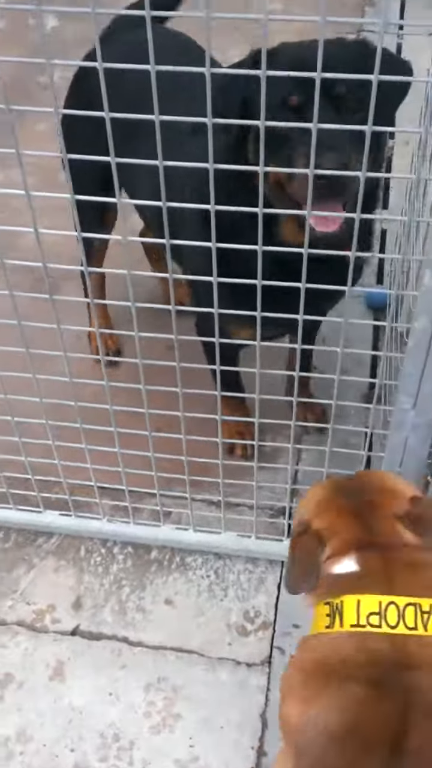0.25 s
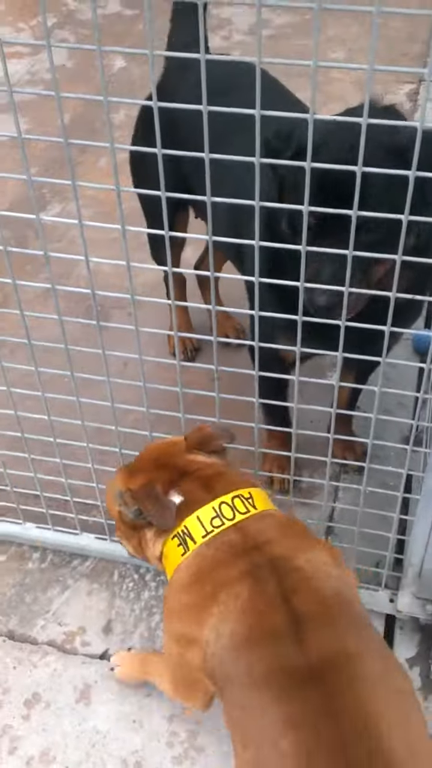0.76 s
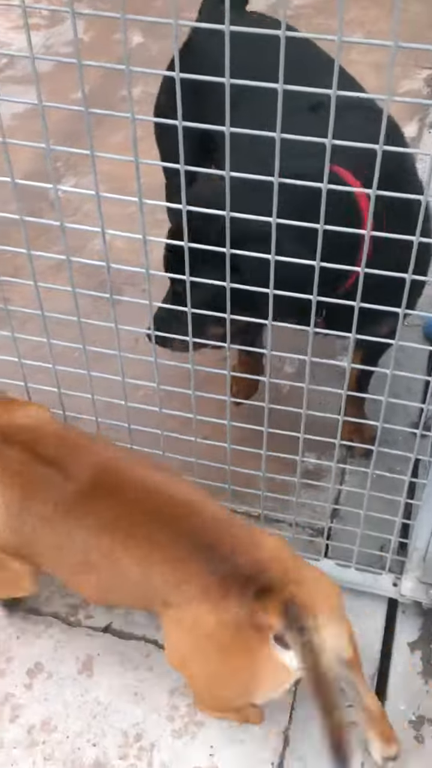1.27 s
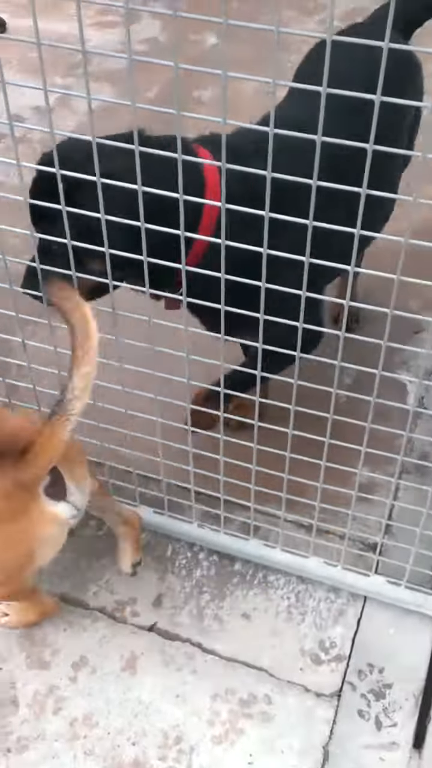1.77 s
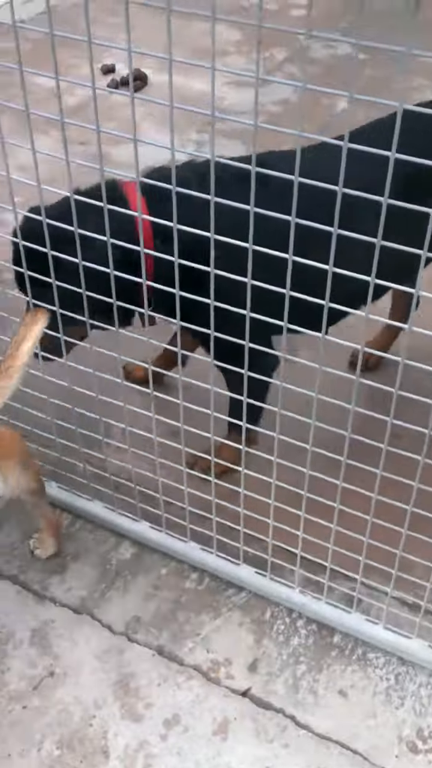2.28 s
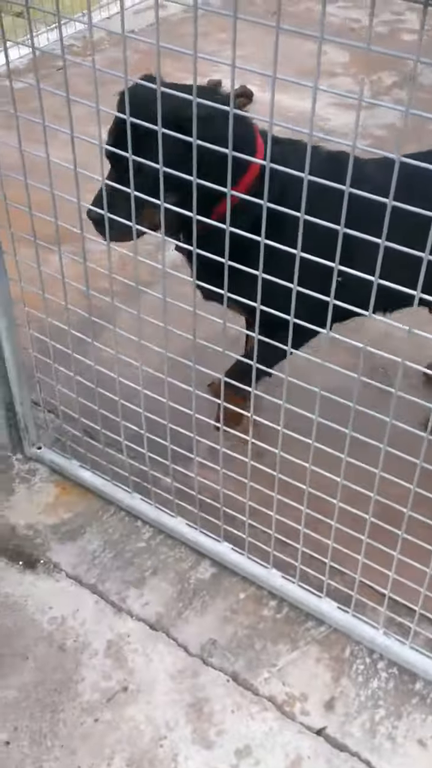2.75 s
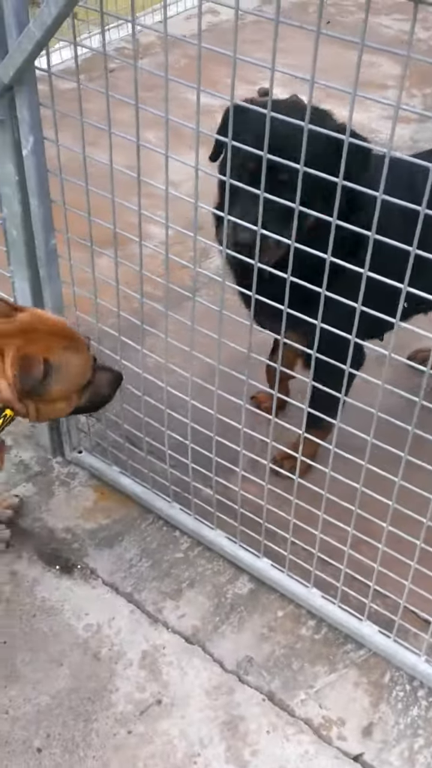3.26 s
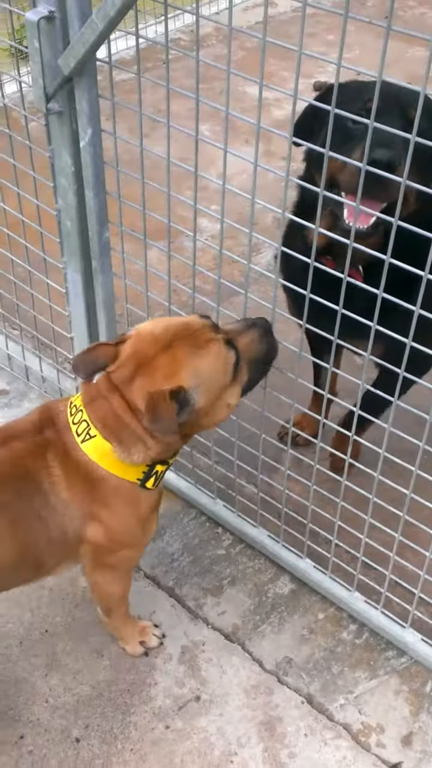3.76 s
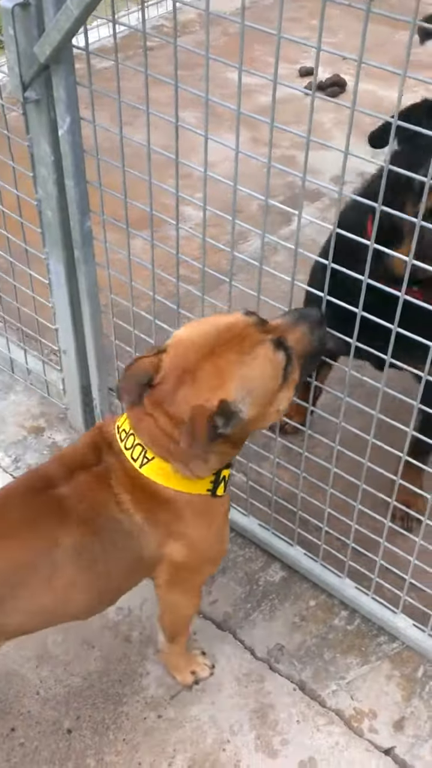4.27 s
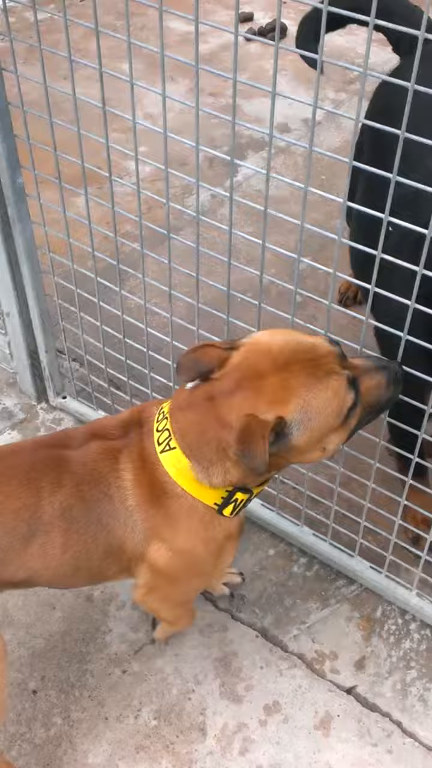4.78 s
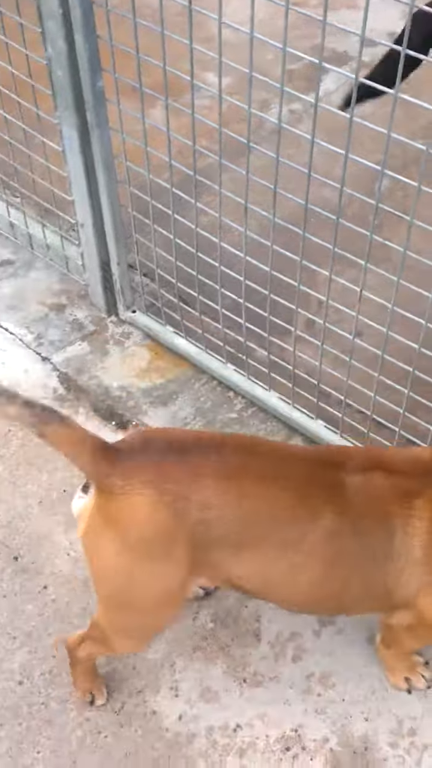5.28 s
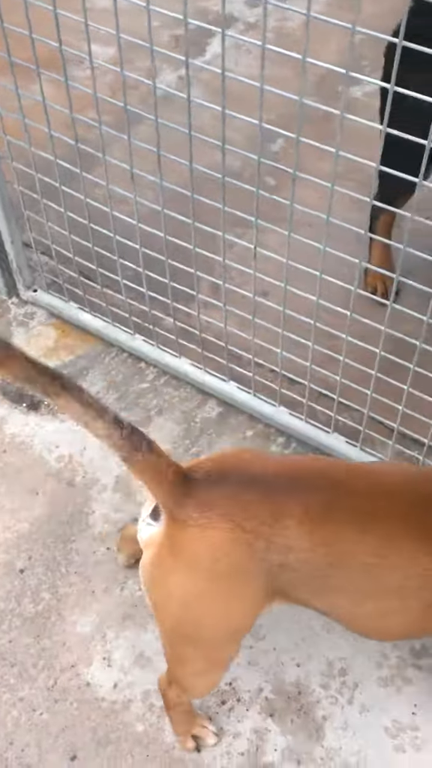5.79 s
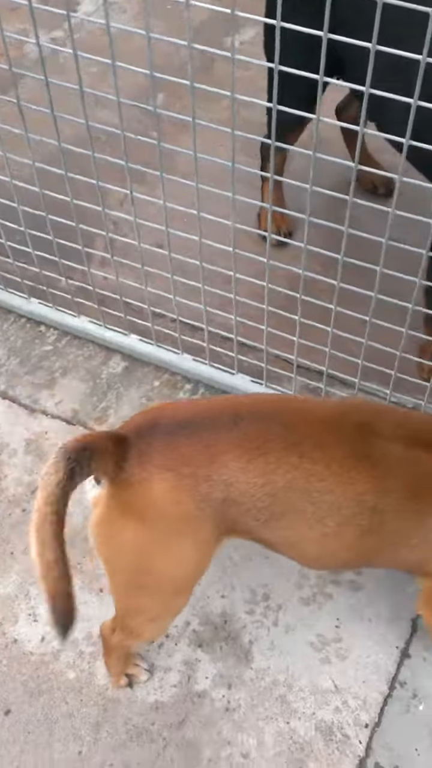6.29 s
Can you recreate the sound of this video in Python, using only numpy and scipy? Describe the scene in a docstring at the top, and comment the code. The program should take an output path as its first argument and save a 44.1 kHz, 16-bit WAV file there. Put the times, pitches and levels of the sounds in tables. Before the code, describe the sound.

Close stereo pickup beside a wire kennel fence: distant rough barking first, then nearly four seconds of quiet sniffing, muffled wuffs, sparse padded steps and tiny high whines over faint hiss. Four loud, abrupt barks burst out nearby, breaking hoarsely at their ends, with brief growls. Farther dogs join with raspy barks, a throbbing howl and whimpers, as bright nose whistles rise; short hard reverberation surrounds everything.

```python
"""Concrete kennel block, outdoors: dogs at a wire fence close to the microphones, others farther down the pens.
Up close come closed-mouth wuffs, then four sharp, cracking barks with low growls between and after;
farther off are hoarse barks, a pulsing howl and falling whimpers, all from the same modelled vocal folds.
Nasal whistles are arching tones; snuffles, paw steps, faint background noise and a high hiss of varying
level are coloured noise. Decaying noise tails give the echo of the pens."""
import sys
import numpy as np
from scipy import signal
from scipy.fft import rfft, irfft, next_fast_len
from scipy.io import wavfile
from scipy.ndimage import map_coordinates

SR = 44100
rng = np.random.default_rng(int(sys.argv[2]) if len(sys.argv) > 2 else 0)


def master_out(mix):
    """Clip the mix to full scale and print it as 16-bit PCM to the path in sys.argv[1]."""
    frames = np.transpose(np.atleast_2d(mix))
    ceiling = np.clip(frames, -1, 1)
    pcm = np.round(ceiling * 32767).astype(np.int16)
    wavfile.write(sys.argv[1], SR, pcm)


N = 288414  # samples

# Levels are those of the sources, ahead of the pens' direct and echo gains.
# Overtone levels are relative to the fundamental; roughness is clipped to 0-1.

# close wuffs: (start [s], length [s], top pitch [Hz], level [dB], top overtones [dB],
#               roughness at the push [0-1 once clipped])
WUFF_CALLS = [(0, .034, 472, -36, 0.5, 0.31), (0.836, 0.13, 510, -38, 6, 1.18),
              (2.535, 0.13, 525.3, -38.5, 1, 1.17)]
# close growls: (start [s], length [s], pitch [Hz], level [dB], overtones [dB])
GROWL_CALLS = [(0, 0.014, 142, -31.5, -4.5), (.85, 0.158, 179, -52.5, -15), (4.115, 0.07, 289, -41, 4),
               (4.403, .08, 257.6, -37.5, -6), (4.686, 0.05, 267.4, -38.5, 5),
               (5.18, 0.049, 258, -43, -4.5)]
# distant barks: (start [s], length [s], top pitch [Hz], level [dB], overtones [dB], roughness [0-1])
FAR_BARK_CALLS = [ (0.084, .253, 790.3, -26.5, 0, .72), (0.364, .275, 806, -24.5, -2.5, .85),
                  (4.697, .25, 789.6, -24.5, -5, .6), (5.159, 0.22, 771, -26, -4.5, 0.9),
                  (5.367, .33, 817.3, -26, -7.5, 0.59), (6.004, .12, 901, -37, -6, 0.9)]
# nostril puffs: (centre [s], length [s], level [dB], resonance [Hz])
SNUFFLE_PUFFS = [(0.574, 0.18, -52, 7100), (0.968, 0.12, -49.5, 3930), (1.327, 0.17, -57, 2680),
                 (1.768, 0.19, -55, 1550), (2.34, 0.068, -71.5, 7240), (2.628, .13, -56.5, 6920),
                 (2.956, 0.15, -60.5, 2500), (3.851, 0.1, -67, 7600)]
# nose whistles: (crest [s], lead-in [s], tail [s], top pitch [Hz], level [dB], time to sag an octave [s])
WHISTLE_CALLS = [ (.545, .005, .11, 3330, -42.5, .2), (1.12, 0.061, .1, 5490, -61.5, 0.35),
                 (1.445, .02, .05, 5650, -49, .12), (1.57, 0.044, .08, 4720, -61.5, .35),
                 (1.891, 0.045, 0.041, 4790, -56.5, 0.32), (2.024, .045, 0.14, 5090, -58.5, 0.29),
                 (2.448, 0.018, .06, 5270, -63, .25), (2.511, 0.018, 0.11, 4740, -53, 0.084),
                 (2.76, 0.055, 0.012, 3550, -69.5, 0.75), (3.441, .035, 0.12, 3195, -62.5, 0.19),
                 (3.457, 0.02, 0.13, 5610, -47.5, 0.16), (3.72, .09, 0.027, 7200, -54.5, 0.34),
                 (4.419, .025, .07, 4080, -47.5, .17), (4.815, 0.019, 0.078, 5590, -42.5, 0.11),
                 (4.9, 0.029, 0.034, 4850, -49.5, 0.27), (4.977, 0.03, 0.033, 6600, -42, 0.25),
                 (5.424, 0.085, 0.13, 5155, -33, 0.18), (5.776, 0.054, 0.095, 4600, -36, 0.25),
                 (5.91, .03, 0.11, 3430, -52, 0.15), (6.16, 0.099, 0.056, 4774, -34.5, 0.25),
                 (6.25, 0.018, 0.07, 4340, -44.5, 0.1), (6.329, .01, 0.12, 3240, -58, 0.32),
                 (6.487, .036, .09, 4610, -36.5, .2)]
# steps on concrete: (time [s], level [dB], extra claw level [dB]), before the trims in paws()
PAW_STEPS = [(1.064, -46, -14), (1.218, -49.5, -4.5), (1.878, -86, 10), (2.346, -45.5, -1.5),
             (3.056, -48, -1.5), (3.57, -45, -25)]
# close barks: (crest [s], lead-in [s], tail [s], half-width of the rise [s], first pitch [Hz], top pitch [Hz],
#               first level [dB], top level [dB], first overtones [dB], top overtones [dB])
BARK_CALLS = [ (3.974, .06, 0.073, .02, 636, 751.2, -30, -10.5, 6, -8.5),
              (4.272, .048, 0.078, 0.034, 524.7, 660.6, -23, -10, 1, -14.5),
              (4.588, .112, 0.086, .075, 302, 692, -36, -12, -18, -15.5),
              (5.108, .1, 0.077, .05, 386, 707.5, -39, -13.5, 0.5, -6)]
# voice cracks in the close barks: (time [s], half-width [s], overtone boost [dB])
BARK_CRACKS = [(3.957, 0.014, 9), (4.003, 0.014, 1.5), (4.304, 0.015, 13.5), (4.344, .009, 14.5),
               (4.62, 0.025, 13.5), (5.084, .012, 13), (5.137, 0.026, 4)]
# pulsing level of the distant howl: (time [s], level [dB])
HOWL_LEVEL = [(5.63, -35.5), (5.724, -25.5), (5.752, -40.5), (5.772, -25), (5.846, -42.5), (5.906, -26),
              (5.966, -40), (5.995, -51)]
# distant whimpers: (start [s], length [s], first pitch [Hz], last pitch [Hz], first level [dB], roughness [0-1])
WHIMPER_CALLS = [(5.759, 0.24, 1250, 1070, -42, .2), (6.041, 0.2, 866, 750, -40, .35),
                 (6.239, 0.275, 857, 804, -52.5, 0.61)]
# throat resonances, mouth open, close by: (frequency [Hz], gain [dB])
OPEN_MOUTH = [(150, -43), (350, -16), (600, 1), (900, -1.5), (1200, 11.5), (1600, -10.5), (1950, 0),
              (2300, -18.5), (2750, -14), (3300, -27), (5300, -19.5), (6650, -14.5), (7150, -3.5),
              (7800, -21.5), (8800, -20.5), (10000, -39)]
# throat resonances, mouth closed, close by: (frequency [Hz], gain [dB])
CLOSED_MOUTH = [(100, -26.5), (175, 0), (290, -27.5), (450, 3.5), (620, 11), (800, -3.5), (1150, -7.5),
                (1500, -23.5), (2100, -27), (4000, -46), (10000, -45.5)]
# throat resonances of the distant dogs: (frequency [Hz], gain [dB])
FAR_MOUTH = [(150, -21.5), (300, -20.5), (390, -3), (540, -0.5), (820, 10), (1200, 2.5), (1600, -3),
             (1900, -6.5), (2500, -23), (3800, -30), (5000, -27), (7300, -25.5), (10000, -42.5)]
# breath noise from the nose, relative: (frequency [Hz], density [dB per Hz])
NOSE_COLOUR = [(200, -35.5), (850, -2), (1400, 0), (2100, -5), (2800, -3.5), (3400, -4.5), (4000, -4.5),
               (5500, -4.5), (8000, -2.5), (10500, -14)]
# background noise, relative: (frequency [Hz], density [dB per Hz])
AIR_COLOUR = [(25, 3.5), (55, -23), (110, -7), (190, 0.5), (400, -3.5), (800, -4.5), (1260, -15.5),
              (2300, -26.5), (4200, -20), (7200, -36.5), (10500, -32.5)]
# course of the high hiss, before the trim in background(): (time [s], level [dB])
HISS_LEVEL = [(0.0, -64), (0.16, -65), (0.36, -58), (0.54, -60.5), (0.67, -65.5), (1.67, -57.5),
              (1.93, -60), (2.86, -60.5), (3.11, -67.5), (3.33, -61), (3.5, -57), (3.97, -54),
              (4.13, -45.5), (4.52, -46), (4.81, -52), (5.37, -46), (5.57, -49.5), (6.54, -48)]
# high hiss, also used for whistle breath and claws, relative: (frequency [Hz], density [dB per Hz])
TREBLE_COLOUR = [(2000, -16), (4000, -16.5), (5500, -6.5), (7500, -1), (10500, -16.5)]
# echo of the concrete pens: (frequency [Hz], time to decay by 60 dB [s])
PEN_DECAY = [(200, 0.32), (800, 0.45), (2000, 0.38), (6000, 0.29), (10000, 0.22)]

TOP_HZ = 10600  # nothing is heard above this
SWELL_S, FADE_S = .016, 0.0095  # soft start and end of calls
WUFF_CREST, WUFF_WIDTH = .62, 0.3  # place and half-width of the push, as shares of the length
WUFF_BEND_OCT, WUFF_OPEN_DB = .33, 20  # the push raises the pitch and brings out the overtones
GROWL_ROUGH = .75  # 0-1
FAR_ATTACK_S, FAR_RELEASE_S, FAR_CREST = .028, 0.0342, 0.3523  # the crest is a share of the length
FAR_EDGE_DB, FAR_OPEN_DB, FAR_SAG_DB = -26, -5, -10  # re the crest: both ends, after attack, before release
FAR_DB_PER_OCT = 91  # pitch follows the level
WHISTLE_DB_PER_OCT, WHISTLE_FADE_DB = 78.5, 14  # a lower pitch is weaker, down to this much
WHISTLE_FLICKER_DB, WHISTLE_FLICKER_HZ = 9, 46.6  # spread at full fuzz, random knots a second
WHISTLE_FUZZ, WHISTLE_TAIL_FUZZ = 0.27, 0.17  # noisy share: at the crest, added as the pressure drops
WHISTLE_CLEAR_DB, WHISTLE_FUZZ_PER_DB = -41.5, .012  # below this top level a whistle turns breathy
FALL_S, REST_HZ, EBB_DB = .098, 251.3, 27.5  # a bark's fall: half-width, pitch of slack folds, level lost
CRACK_DIP_DB = 3.5  # the level dips while the voice cracks
# roughness: at first, added in a crack, added as the effort ebbs
CLEAN_ROUGH, CRACK_ROUGH, HOARSE_ROUGH = 0.049, 0.34, 0.67
HOWL_HZ, HOWL_SAG_HZ_PER_S, HOWL_OVERTONES_DB, HOWL_ROUGH = 958, 130, -23, 0.029
WHIMPER_FALL_S, WHIMPER_OVERTONES_DB, WHIMPER_FADE_DB_PER_S = 0.055, -16, 22


def amp(db):
    """Decibels to gain."""
    return 10 ** (np.asarray(db) / 20)


def unit(x):
    """Scale to rms 1."""
    return x / np.sqrt(np.mean(x ** 2) + 1e-20)


def along(points, hz):
    """(Hz, value) points read on a log axis."""
    f, v = np.transpose(points)
    return np.interp(np.log(hz + 1), np.log(f + 1), v)


def curve(rows, t):
    """(time, level) rows read at times t."""
    s, level = np.transpose(rows)
    return np.interp(t, s, level)


def span(start, length):
    """Sample times of a call."""
    return np.arange(int(start * SR), int((start + length) * SR)) / SR


def bell(x, width):
    """A smooth hump of height 1 at x = 0."""
    return np.exp(-(x / width) ** 2)


def soft_ends(t):
    """A gain that opens and closes over the times of a call."""
    return np.clip((t - t[0]) / SWELL_S, 0, 1) * np.clip((t[-1] - t) / FADE_S, 0, 1)


def wobble(n, rate):
    """A smooth random curve, rate knots a second."""
    knots = rng.standard_normal(int(n * rate / SR) + 4)
    return map_coordinates(knots, [np.arange(n) * rate / SR])


def coloured(x, spectrum):
    """x through a (Hz, dB) colour."""
    n = x.shape[-1]
    m = next_fast_len(n + 8192)
    gain = amp(along(spectrum, np.fft.rfftfreq(m, 1 / SR)))
    return irfft(rfft(x, m) * gain, m)[..., :n]


def noise(shape, spectrum):
    """Coloured noise of rms 1."""
    return unit(coloured(rng.standard_normal(shape), spectrum))


def add(track, s, x):
    """Mix x into the track at time s."""
    start = int(np.clip(s * SR, 0, N))
    track[start:start + len(x)] += x[:N - start]


def voice(calls, throat, jitter, shimmer_db, doubling, rasp, flutter_hz,
          uneven_db=8.5, puff_depth=0.8, smear=0.17):
    """Vocal folds that run clean when eased and break into half-pitch tones and rasp when forced."""
    out = np.zeros(N)
    for t, pitch, db, overtones_db, rough in calls:
        n, gate = len(t), soft_ends(t)
        rough = np.clip(rough, 0, 1)
        shaken_hz = pitch * (1 + jitter * rough * wobble(n, flutter_hz))
        phase = 2 * np.pi * np.cumsum(shaken_hz) / SR
        overtones, power = np.zeros(n), np.zeros(n)
        for k in [1 / 2, *np.arange(3, 33) / 2]:
            gain = amp(along(throat, k * pitch)) * (k * pitch < TOP_HZ)
            # unequal alternate cycles put lines halfway between the harmonics
            if k % 1:
                gain = gain * doubling * rough
            # every partial swells and drifts at random on its own
            gain = gain * amp(uneven_db * np.tanh(wobble(n, 69.0)))
            start_phase = rng.uniform(0, 2 * np.pi)
            drift = k * (smear + 0.28 * rough) * wobble(n, 170.2)
            overtones += gain * np.sin(k * phase + start_phase + drift)
            power += gain ** 2 / 2
        # air escapes in one puff per double cycle and rings the same throat
        puffs = rng.standard_normal(n) * (1 + puff_depth * np.cos(phase / 2))
        puffs = unit(coloured(puffs, throat))
        share = np.clip(rasp * rough, 0, 1)
        upper = np.sqrt(1 - share) * overtones / np.sqrt(power + 1e-12) + np.sqrt(share) * puffs
        tremble = amp(shimmer_db * rough * np.tanh(wobble(n, 150)))
        fundamental = np.sqrt(2) * np.sin(phase)
        call = gate * tremble * amp(db) * (fundamental + amp(overtones_db) * upper)
        add(out, t[0], call)
        # four short, randomly delayed copies of the treble make the upper partials uneven
        treble = coloured(call, [(900, -40), (2200, -8)])
        for delay_s in rng.uniform(.0005, .008, size=4):
            add(out, t[0] + delay_s, treble)
    return out


def wuffs():
    """A hum behind closed lips is pushed up into a short rasp."""
    for start, length, top_hz, db, overtones_db, rough in WUFF_CALLS:
        t = span(start, length)
        slack = 1 - bell((t - start) / length - WUFF_CREST, WUFF_WIDTH)
        pitch = top_hz * 2 ** (-WUFF_BEND_OCT * slack)
        yield t, pitch, db, overtones_db - WUFF_OPEN_DB * slack ** 2, rough * np.sqrt(1 - slack)


def growls():
    """Slack folds rattle at a low, steady pitch."""
    for start, length, hz, db, overtones_db in GROWL_CALLS:
        t = span(start, length)
        yield t, np.full(len(t), hz), db, overtones_db, GROWL_ROUGH


def background(air_db=-63, hiss_db=-3, width=0.32):
    """Faint background noise and a high hiss of varying level, spread between the microphones."""
    level_db = curve(HISS_LEVEL, np.arange(N) / SR)
    drift_db = 1.2 * wobble(N, 9)
    air = amp(air_db + drift_db) * noise((2, N), AIR_COLOUR)
    mid, side = air + amp(hiss_db + level_db) * noise((2, N), TREBLE_COLOUR)
    return np.array([mid + width * side, mid - width * side])


def far_barks():
    """Hoarse barks: quick attack, a swell, a slow sag and a release, the pitch going with the level."""
    for start, length, top_hz, db, overtones_db, rough in FAR_BARK_CALLS:
        t = span(start, length)
        effort_db = np.interp(t - start, [0, FAR_ATTACK_S, FAR_CREST * length, length - FAR_RELEASE_S, length],
                              [FAR_EDGE_DB, FAR_OPEN_DB, 0, FAR_SAG_DB, FAR_EDGE_DB])
        yield t, top_hz * 2 ** (effort_db / FAR_DB_PER_OCT), db + effort_db, overtones_db, rough


def snuffles(ring_db=-1):
    """Short puffs through a dog's muzzle, each with one nostril resonance standing out."""
    out = np.zeros(N)
    for s, length, db, hz in SNUFFLE_PUFFS:
        n = int(length * SR)
        ring = noise(n, [(hz / 2, -30), (hz * .88, -11), (hz, 0), (hz * 1.12, -11), (hz * 2, -30)])
        puff = noise(n, NOSE_COLOUR) + amp(ring_db) * ring
        add(out, s - length / 2, amp(db) * np.hanning(n) * puff)
    return out


def whistles(waver=0.0051, octave_db=-15, breath_db=-12):
    """A whining dog's nose whistles: a clearer tone when blown hard, fuzzier when weak, over escaping air."""
    out = np.zeros(N)
    for crest, lead, tail, top_hz, top_db, octave_s in WHISTLE_CALLS:
        t = span(crest - lead, lead + tail)
        n = len(t)
        # pitch and level arch together with the pressure
        sag_oct = ((t - crest) / octave_s) ** 2
        weak = np.tanh(WHISTLE_DB_PER_OCT * sag_oct / WHISTLE_FADE_DB)
        breathy = WHISTLE_FUZZ_PER_DB * max(WHISTLE_CLEAR_DB - top_db, 0)
        fuzz = np.clip(WHISTLE_FUZZ + breathy + WHISTLE_TAIL_FUZZ * weak, 0, 1)
        flicker_db = WHISTLE_FLICKER_DB * np.sqrt(fuzz) * wobble(n, WHISTLE_FLICKER_HZ)
        db = top_db - WHISTLE_FADE_DB * weak + flicker_db
        pitch = top_hz * 2 ** -sag_oct * (1 + waver * wobble(n, 220))
        phase = 2 * np.pi * np.cumsum(pitch) / SR
        eddies = (wobble(n, 650) + 1j * wobble(n, 650)) / np.sqrt(2)
        steadiness = np.sqrt(1 - fuzz) + np.sqrt(fuzz) * eddies
        tone = np.real(steadiness * (np.exp(1j * phase) + amp(octave_db) * np.exp(2j * phase)))
        breath = amp(breath_db) * noise(n, TREBLE_COLOUR)
        add(out, t[0], soft_ends(t) * amp(db) * (np.sqrt(2) * tone + breath))
    return out


def paws(pad_hz=200, pad_t60=0.071, claw_t60=0.034, pad_db=-3, claw_db=-6):
    """A pad thumps on concrete and a claw ticks."""
    out, t = np.zeros(N), np.arange(SR // 4) / SR
    for s, db, tick_db in PAW_STEPS:
        pad = noise(len(t), [(pad_hz / 2, -20), (pad_hz, 0), (pad_hz * 2, -20), (3000, -60)])
        pad *= amp(pad_db - 60 * t / pad_t60)
        claw = noise(len(t), TREBLE_COLOUR) * amp(claw_db + tick_db - 60 * t / claw_t60)
        soft_onset = 1 - np.exp(-t / 0.0046)
        add(out, s, amp(db) * (pad * soft_onset + claw))
    return out


def near_barks():
    """One surge of effort carries the voice up to the crest; it cracks around there and ebbs away hoarse."""
    for (crest, lead, tail, rise_s, first_hz, top_hz, first_db, top_db,
         first_overtones_db, top_overtones_db) in BARK_CALLS:
        t = span(crest - lead, lead + tail)
        rising = t < crest
        slack = 1 - bell(t - crest, np.where(rising, rise_s, FALL_S))
        pitch = top_hz + slack * (np.where(rising, first_hz, REST_HZ) - top_hz)
        level_db = top_db + slack * np.where(rising, first_db - top_db, -EBB_DB)
        overtones_db = top_overtones_db + slack * rising * (first_overtones_db - top_overtones_db)
        crack = sum(bell(t - s, width) for s, width, _ in BARK_CRACKS)
        boost_db = sum(gain_db * bell(t - s, width) for s, width, gain_db in BARK_CRACKS)
        rough = CLEAN_ROUGH + CRACK_ROUGH * crack + HOARSE_ROUGH * ~rising * np.sqrt(slack)
        yield t, pitch, level_db - CRACK_DIP_DB * crack, overtones_db + boost_db, rough


def howls():
    """A clear howl pulses in level as its pitch sags; short whimpers drop in pitch and fade."""
    first_s, last_s = HOWL_LEVEL[0][0], HOWL_LEVEL[-1][0]
    t = span(first_s, last_s - first_s)
    pitch = HOWL_HZ - HOWL_SAG_HZ_PER_S * (t - t[0])
    yield t, pitch, curve(HOWL_LEVEL, t), HOWL_OVERTONES_DB, HOWL_ROUGH
    for start, length, first_hz, last_hz, db, rough in WHIMPER_CALLS:
        t = span(start, length)
        pitch = last_hz + (first_hz - last_hz) * bell(t - start, WHIMPER_FALL_S)
        yield t, pitch, db - WHIMPER_FADE_DB_PER_S * (t - start), WHIMPER_OVERTONES_DB, rough


def pens(x, direct_db, wet_db, width):
    """The direct sound plus the concrete pens' echo, nearly alike at both microphones."""
    hz, t, z = signal.stft(rng.standard_normal((2, SR)), SR, nperseg=256)
    decay = amp(-60 * t / along(PEN_DECAY, hz)[:, None])
    tails = signal.istft(z * decay, SR, nperseg=256)[1]
    tails /= np.linalg.norm(tails, axis=1, keepdims=True)
    late = np.pad(x, (SR // 150, 0))  # the echo starts 1/150 s after the direct sound
    mid, side = signal.fftconvolve(late[None], tails, axes=1)[:, :N]
    return amp(direct_db) * x + amp(wet_db) * np.array([mid + width * side, mid - width * side])


def scene():
    """Each group of sounds gets its own balance of direct sound and echo, over the background noise and hiss."""
    barking = voice(near_barks(), OPEN_MOUTH, jitter=0.066, shimmer_db=4, doubling=2.3, rasp=0.56, flutter_hz=301)
    growling = voice(growls(), OPEN_MOUTH, jitter=.11, shimmer_db=3.4, doubling=.8, rasp=0.67, flutter_hz=152.4)
    muffled = voice(wuffs(), CLOSED_MOUTH, jitter=0.079, shimmer_db=4, doubling=0.28, rasp=0.91, flutter_hz=246)
    far = voice(far_barks(), FAR_MOUTH, jitter=0.109, shimmer_db=4, doubling=1.1, rasp=0.99,
                flutter_hz=248.7, puff_depth=0.34)
    howling = voice(howls(), FAR_MOUTH, jitter=0.21, shimmer_db=3.5, doubling=1.0, rasp=0.91, flutter_hz=124.2)
    dogs = pens(barking + growling + muffled, direct_db=-1.0, wet_db=-8.5, width=0.21)
    dogs += pens(far, direct_db=-0.5, wet_db=-6.5, width=0.35)
    dogs += pens(howling, direct_db=0.2, wet_db=-10.5, width=.25)
    dogs += pens(whistles(), direct_db=-2, wet_db=-8.5, width=.2)
    dogs += pens(snuffles() + paws(), direct_db=4.0, wet_db=-11.5, width=.25)
    return dogs + background()


def record(dry, centre_hz=1170, width_hz=520, band_db=-4.0, flat_db=-15):
    """A delayed, band-weighted copy of the middle widens the image; peaks are rounded, lows and top cut."""
    m = next_fast_len(N + 8192)
    hz, both = np.fft.rfftfreq(m, 1 / SR), rfft(dry, m)
    band = 1j * hz * width_hz / (centre_hz ** 2 - hz ** 2 + 1j * hz * width_hz)
    delay = np.exp(-2j * np.pi * hz * .00164)  # 1.64 ms
    side = both.mean(axis=0) * delay * (amp(band_db) * band + amp(flat_db))
    wide = irfft(both + np.array([side, -side]), m)
    rounded = wide / (1 + (wide / .9) ** 12) ** (1 / 12)
    low_cut = hz ** 2 / np.sqrt(hz ** 4 + 65 ** 4)  # below 65 Hz
    return irfft(rfft(rounded) * low_cut * (hz < TOP_HZ), m)[:, :N]


dry = scene()
out = record(dry)
master_out(out)
```